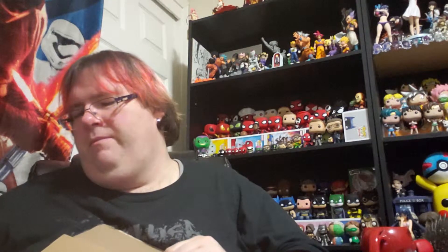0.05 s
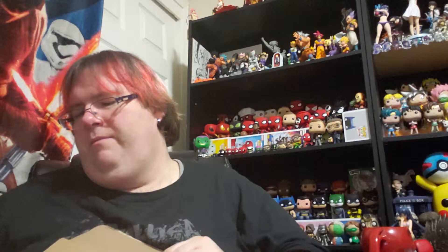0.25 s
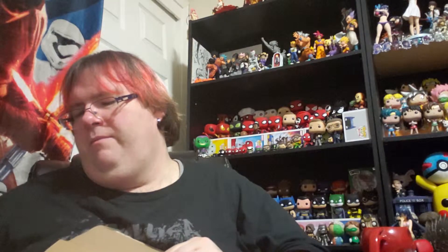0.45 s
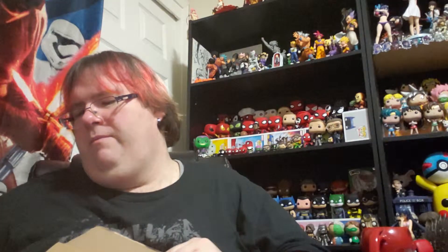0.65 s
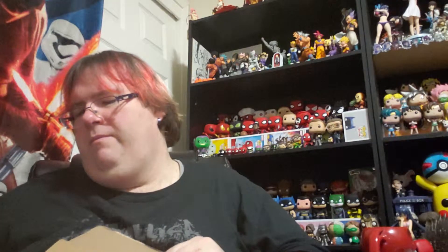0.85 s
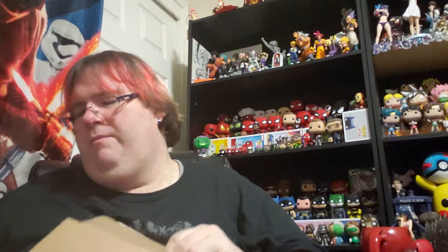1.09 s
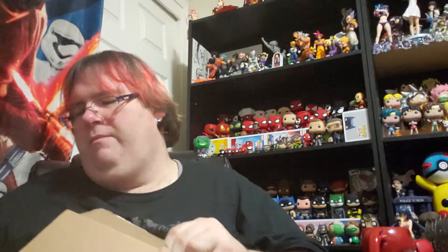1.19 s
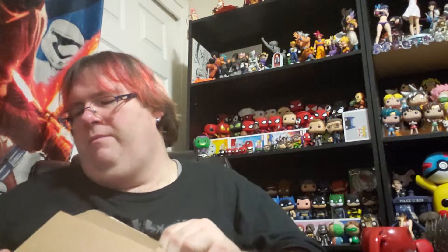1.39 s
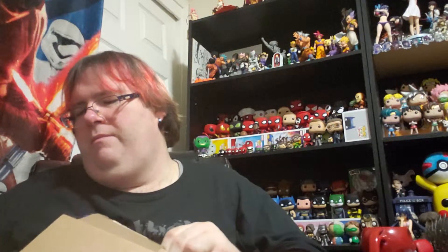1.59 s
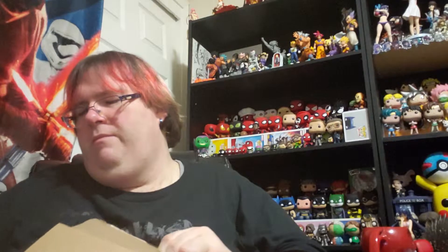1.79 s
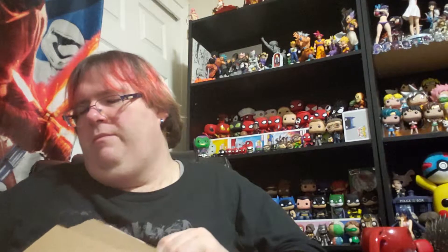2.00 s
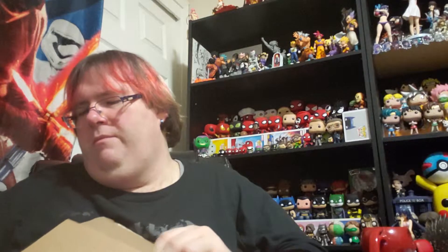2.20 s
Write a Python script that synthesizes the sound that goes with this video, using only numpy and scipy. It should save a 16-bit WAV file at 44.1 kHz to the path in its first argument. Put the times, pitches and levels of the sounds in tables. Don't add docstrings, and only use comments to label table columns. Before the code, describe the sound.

Packing tape tears off a hollow cardboard box in a quick run of crackly strokes, then quiet hand rubbing, one more short rip, a scrape and sharp film snaps, close-miked in a small furnished room with faint hiss.

```python
import sys
import numpy as np
from scipy import signal
from scipy.fft import rfft, irfft
from scipy.io import wavfile

SR = 44100
rng = np.random.default_rng(int(sys.argv[2]) if len(sys.argv) > 2 else 0)


def transcribe(u):
    v = np.clip(np.atleast_2d(u).T, -1, 1)
    q = np.round(v * 32767).astype(np.int16)
    wavfile.write(sys.argv[1], SR, q)


def gain_from_decibels(decibels):
    exponent = np.asarray(decibels, float) / 20
    return 10 ** exponent


N = 99225


def unit(x):
    return x / np.sqrt(np.mean(x ** 2))


def butter(x, order, hz, kind="low"):
    return signal.lfilter(*signal.butter(order, hz, kind, fs=SR), x)


def convolve(x, response):
    return signal.fftconvolve(x, response)[:N]


def colour(x, table):
    hz, db = np.array(table).T
    grid_hz = np.arange(1025) * SR / 2048
    log_gain = np.interp(np.log(grid_hz + 1), np.log(hz), db) * np.log(10) / 20
    cepstrum = irfft(log_gain)
    cepstrum[1:1024] = 2 * cepstrum[1:1024]
    cepstrum[1025:] = 0
    return convolve(x, irfft(np.exp(rfft(cepstrum))))


def walk(rate_hz):
    return unit(butter(rng.standard_normal(N), 2, rate_hz))


def clicks(per_s, spread_db):
    chance, side, size = rng.random((3, N))
    happens = chance < per_s / SR
    return unit(happens * np.sign(side - .5) * gain_from_decibels(-spread_db * np.log(1 - size)))


def spikes(table, gain_db):
    out = np.zeros(N)
    np.add.at(out, (np.array(table)[:, 0] * SR).astype(int), gain_from_decibels(gain_db))
    return out


def ring(modes, flip=-1, shift=1):
    t = np.arange(8192) / SR
    response = np.zeros(len(t))
    for k, (hz, db, t60) in enumerate(modes):
        decay = np.exp(-np.log(1000) * t / t60) / np.sqrt(t60)
        response += flip ** k * gain_from_decibels(db) * np.sin(2 * np.pi * hz * shift * t) * decay
    return response / np.sqrt(np.sum(response ** 2))


# frequency in Hz, level in dB, t60 in seconds.
BOX_MODES = [(170.2, -2.5, 0.2), (263, -8, 0.11), (353.6, -3.5, 0.07), (423, -2, 0.025), (486.3, 1, 0.11),
             (584.3, 0, 0.084), (679, 4.5, 0.042), (743, 6, 0.011), (872, 1.5, 0.025), (1022, -13.5, 0.095),
             (1094, -11, 0.0054)]
# frequency in Hz, level in dB, t60 in seconds.
FACE_MODES = [(1613, 6, 0.016), (1609, 7.5, 0.0069), (1998, -1.5, 0.083), (2290, 2.5, 0.0018),
              (3116, -0.5, 0.014), (3900, 1, 0.00099), (4505, 2.5, 0.0052), (5890, 4.5, 0.0026),
              (6200, -7, 0.0067)]


def bodies(box, face, film, modes=FACE_MODES, flip=-1, shift=1):
    bright = butter(film, 1, 5300, "high")
    hollow = butter(convolve(box, ring(BOX_MODES, flip, shift)), 2, 152, "high")
    return hollow + convolve(face, ring(modes, shift=shift)) + bright


def rubbing(table, force, box_db, face_db, film_db, modes=FACE_MODES, shift=1):
    s, *columns = np.array(table).T
    t = np.arange(N) / SR
    pull, press, film = (np.interp(t, s, column, -200, -200) for column in columns)
    f = force * gain_from_decibels(pull)
    return bodies(f * gain_from_decibels(press + box_db), f * gain_from_decibels(face_db), f * gain_from_decibels(film + film_db), modes, shift=shift)


# time in seconds, pull in dB, pressure on the box in dB, film stretch in dB.
STROKES = [
    [(.18, -70.5, -4, -7), (.208, -52, -5, -5.5), (.234, -42, 6, -7), (.292, -35, 1.5, -25.5),
     (.304, -25.5, -16, -5.5), (.328, -37, 1, -15.5), (.335, -47, -12, -10), (.36, -44, -3, -8)],
    [(.366, -57.5, -9, -8), (.374, -36, 14, -5), (.379, -33, -27, -13), (.385, -44, -14, -12),
     (.392, -43, -11, -6.5), (.4, -52, -4, -11)],
    [(.523, -55.5, -2, -3), (.555, -41, -4, -7), (.561, -35, 2, -1), (.568, -35, -4.5, 5),
     (.578, -45, 8, -9.5)],
    [(.582, -49, 3, -10), (.585, -25, -3.5, -4), (.591, -30.5, -3, -6.5), (.596, -34, -11, -7)],
    [(.603, -36, 10.5, 8.5), (.609, -27, -7.5, -2.5), (.616, -33, -4, -0.5), (.629, -29, -2.5, -13.5),
     (.639, -39.5, -10.5, -11), (.644, -31, -2.5, -4), (.66, -54, 0, -11)],
    [(.665, -30.5, 6, -27), (.685, -42.5, -11.5, -1), (.693, -29.5, -2.5, -20), (.71, -36, -3, -2),
     (.718, -57, -3.5, -22.5)],
    [(1.611, -53, 16.5, 4), (1.622, -54, 14, 14), (1.632, -40.5, 5, 7.5), (1.641, -48, -6, 10),
     (1.648, -37, 0.5, -1), (1.655, -42.5, -5, -30), (1.67, -58, -18, -9)],
]
STROKE_SHIFTS = [1.001, 1.04, .97, 1.02, .99, 1.03, .96]


def tape():
    jerks = gain_from_decibels(3 * walk(200))
    force = clicks(per_s=6000, spread_db=2.8) * jerks
    return sum(rubbing(stroke, force, box_db=-5, face_db=-2.5, film_db=-6, shift=shift)
               for stroke, shift in zip(STROKES, STROKE_SHIFTS))


# time in seconds, level in dB, pressure in dB.
SLIDE = [(0, -68, 18.5), (.1, -80.5, 7), (.2, -60, 18.5), (.85, -100.5, 2.5), (.99, -72.5, 8.5),
         (1.02, -73, -10), (1.1, -70, -5), (1.15, -69.5, -13), (1.28, -66, 11.5), (1.37, -71, 8),
         (1.48, -71, -12), (1.56, -81, 16.5), (1.75, -70, 7.5), (1.93, -64.5, 7.5), (2.04, -67, 13),
         (2.1, -76, 12), (2.17, -74, -13), (2.25, -81, 4)]
# time in seconds, level in dB, pressure in dB, film in dB.
SCRAPES = [
    [(1.818, -81, 30.5, -9), (1.826, -67, 23, 10), (1.845, -55, 5, 4), (1.88, -60.5, -24, 16),
     (1.91, -86, -16, 26)],
    [(1.14, -72, 0, 7), (1.2, -75.5, -4, -2), (1.28, -78.5, -1, 0), (1.36, -78, 6, -8)],
    [(2.032, -82, -13, 14), (2.08, -67, -7, -4)],
]
# frequency in Hz, level in dB, t60 in seconds.
FIBRE_MODES = [(323, -6, 0.068), (916, -3, 0.012), (1592, -4, 0.0071), (2590, -8.5, 0.0051),
               (4770, 2, 0.0036), (5370, 3.5, 0.0014), (6200, 4, 0.0034), (7800, 0.5, 0.0028)]
# time in seconds, level in dB, pressure in dB, film in dB.
FLEX = [(1.007, -58.5, 9.5, -20.5), (1.016, -64.5, 12.5, -25), (1.026, -60.5, 17.5, -27),
        (1.035, -64.5, 3, -23), (1.05, -76, -2, -20)]
# frequency in Hz, level in dB, t60 in seconds.
FLAP_MODES = [(1810, -5, 0.0075), (3100, -1.5, 0.0089), (4230, -1, 0.0041), (6800, -8, 0.0037)]
# time in seconds, level in dB, pressure in dB, film in dB.
NAIL_DRAG = [(2.19, -66, -2, -4), (2.194, -50, -9, -3.5), (2.21, -56, -8, 1.5), (2.225, -59, 2, 5.5),
             (2.25, -55, -11, 5)]
# frequency in Hz, level in dB, t60 in seconds.
EDGE_MODES = [(353, 4, 0.021), (2600, -9.5, .006), (4420, 0, 0.0066), (5240, 5, 0.0033), (5930, 5, 0.0045),
              (6430, 5.5, 0.0036), (7300, -6, .002)]


def slide():
    force = clicks(per_s=14000, spread_db=1.7) * gain_from_decibels(1.8 * walk(29))
    hand = np.c_[SLIDE, np.zeros(len(SLIDE))]
    parts = [(movement, FIBRE_MODES) for movement in [hand] + SCRAPES]
    parts += [(FLEX, FLAP_MODES), (NAIL_DRAG, EDGE_MODES)]
    return sum(rubbing(movement, force, -14.5, -3.16, -9.5, modes) for movement, modes in parts)


# time in seconds, level in dB, sharpness in dB.
TAPS = [(0.018, -50.5, 3), (0.062, -47.5, -24), (0.135, -45.5, -5.5), (0.185, -48, -16),
        (.226, -29.5, -22.5), (0.238, -29, -14), (0.378, -29, -19), (0.666, -22.5, -22), (0.689, -36.5, 5),
        (0.7, -25, -24), (1.0067, -47, 1), (1.0095, -49, -10.5), (1.427, -56, -26.5), (1.615, -38.5, -13.5),
        (1.62, -27.5, -19), (1.6241, -31, -19), (1.651, -38, -10), (1.824, -41, -23), (1.8445, -33.5, -10),
        (2.195, -50.5, -20), (.251, -25.5, -20), (.273, -52, -15), (.59, -39, -8), (.61, -24, -20.5),
        (.727, -62, -19)]


def taps():
    _, db, sharp = np.array(TAPS).T
    return bodies(spikes(TAPS, db + 12.5), spikes(TAPS, db + sharp + 1.0), np.zeros(N), flip=0.87)


# time in seconds, level in dB, board share in dB.
SNAPS = [(.1442, -53, -15), (.3778, -29, -4), (.524, -54, -6), (.557, -46, -4), (.609, -30, -6),
         (1.0065, -58, 2), (.2213, -48, -20), (.3021, -36, -6), (.328, -36, -2), (.5842, -38, -6),
         (.63, -36, -2), (1.632, -40, -16), (1.141, -61, -8), (1.428, -64, -6), (2.036, -55, -8),
         (1.6186, -37, -16), (1.6232, -36, -14), (1.6456, -30, -18), (1.6476, -27, -18), (1.8523, -31, -28),
         (1.8595, -30, -28), (1.8681, -29, -20), (1.9466, -25, -20), (1.956, -42, -25), (.1092, -60, -20),
         (1.22, -62, -10), (1.28, -61, -10), (1.391, -68, 4), (.704, -38, 2), (.709, -36, 2)]


def snaps():
    decay = np.exp(-np.arange(128) / SR / .0004)
    film = np.zeros(N)
    for s, db, _ in SNAPS:
        crack = rng.standard_normal(128) * decay
        film[int(s * SR):][:128] += gain_from_decibels(db + 12) * crack / np.sqrt(np.sum(crack ** 2))
    film = butter(film, 3, 7500, "high")
    board = spikes(SNAPS, np.array(SNAPS)[:, 1:].sum(axis=1) + 14)
    return film + bodies(np.zeros(N), board, np.zeros(N), FIBRE_MODES)


# time in seconds, level in dB, frequency in Hz.
BUMPS = [(0.324, -45.5, 63.5), (0.681, -47.5, 84), (0.718, -51, 71), (.04, -62, 59.7), (.17, -57, 70),
         (1.439, -56, 52.3), (1.857, -49.5, 55)]


def bumps():
    t = np.arange(N) / SR
    return sum(gain_from_decibels(db) * np.exp(-((t - s) / 0.016) ** 2) * np.sin(2 * np.pi * hz * (t - s))
               for s, db, hz in BUMPS)


def echoes(scatter_db):
    gap_s, t60_low_s, t60_high_s = 0.0086, 0.17, 0.23
    t = np.arange(SR // 3) / SR
    noise = rng.standard_normal((2, len(t)))
    noise[1] += butter(noise[0] - noise[1], 1, 900)
    low = butter(noise, 1, 1660)
    tail = low * gain_from_decibels(-60 * t / t60_low_s) + (noise - low) * gain_from_decibels(-60 * t / t60_high_s)
    tail = tail * np.clip(2 * t / gap_s - 1, 0, 1) ** 2
    early = butter(noise * np.exp(-t / 0.0038), 2, 454, "high")
    return sum(part * gain_from_decibels(db) / np.sqrt(np.sum(part ** 2) / 2)
               for part, db in ((tail, -3.5), (early, scatter_db)))


def room(x, scatter_db):
    places, move_s = 8, .012
    place = np.arange(N) / SR / move_s % places
    wet = np.zeros((2, N))
    for k in range(places):
        distance = np.abs((place - k + places / 2) % places - places / 2)
        near = np.clip(1 - distance, 0, 1)
        wet += signal.fftconvolve((x * np.sqrt(near))[None], echoes(scatter_db), axes=1)[:, :N]
    return wet


# frequency in Hz, level in dB per Hz.
HISS_LEFT = [(30, -103), (80, -87.5), (500, -106), (1200, -116), (5200, -118), (7400, -101), (8600, -123),
             (12000, -117)]
HISS_RIGHT = [(30, -106), (80, -94), (500, -110), (1200, -119), (4000, -122), (8200, -130), (11500, -113),
              (15000, -117)]


def hiss():
    left, right, source = rng.standard_normal((3, N)) * np.sqrt(SR / 2) * gain_from_decibels(.8 * walk(6))
    low_left, low_right = butter([left, right], 1, 900)
    hum_hz, hum_width_hz = 164.5, 1.8
    hum = signal.lfilter(*signal.iirpeak(hum_hz, hum_hz / hum_width_hz, fs=SR), source)
    hum = gain_from_decibels(-70) * unit(hum)
    right = low_left + right - low_right
    return np.array([colour(left, HISS_LEFT) + hum, colour(right, HISS_RIGHT) + 0.32 * hum])


# time in seconds, lag of the left port in seconds.
LEFT_LAG = [(.8, .0002), (1., 0)]
# frequency in Hz, width in Hz, depth from 0 to 1.
SHELL_DIPS = [(1346, 520, 0.57), (7890, 470, 0)]
# frequency in Hz, gain in dB.
PORT_LEFT = [(100, -2.5), (400, -0.5), (1500, 7), (5800, 2), (7600, 3), (8800, -5.5), (12000, -10),
             (15500, -16.5)]
PORT_RIGHT = [(100, -8), (400, -1.5), (1500, -2.5), (5000, -6.5), (8000, -8.5), (10500, 14), (12500, 12.5),
              (15500, 4)]


def scene():
    rub = tape() + slide() + taps() + bumps()
    crack = snaps()
    direct = rub + crack
    n = np.arange(N)
    lag = np.round(SR * np.interp(n / SR, *np.array(LEFT_LAG).T)).astype(int)
    late = direct[np.clip(n - lag, 0, N)]
    air = np.array([late, direct]) + room(rub, -2.5) + .7 * room(crack, -7)
    for hz, width, depth in SHELL_DIPS:
        air = air - min(depth, 1) * signal.lfilter(*signal.iirpeak(hz, hz / width, fs=SR), air)
    air = butter(air, 2, 45, "high")
    return np.array([colour(air[0], PORT_LEFT), colour(air[1], PORT_RIGHT)]) + hiss()


def roll_off(x):
    return signal.sosfilt(signal.butter(12, 16810, fs=SR, output="sos"), x)


def record(dry):
    ceiling = .3
    rounded = ceiling * np.tanh(dry / ceiling)
    top_cut = signal.ellip(12, .3, 80, 15800, fs=SR, output="sos")
    return roll_off(signal.sosfilt(top_cut, rounded))


dry = scene()
out = record(dry)
transcribe(out)
```